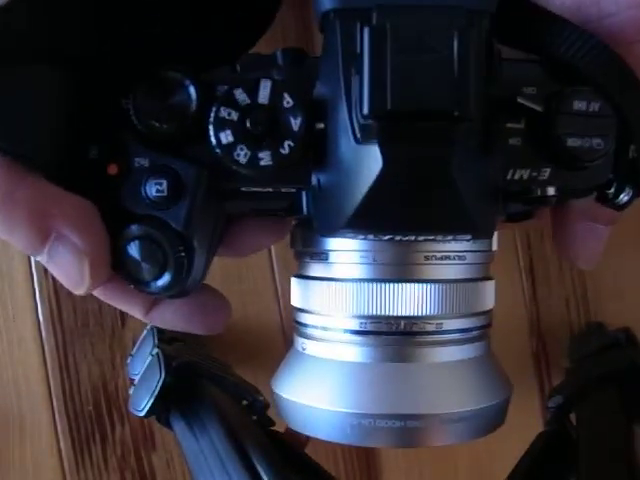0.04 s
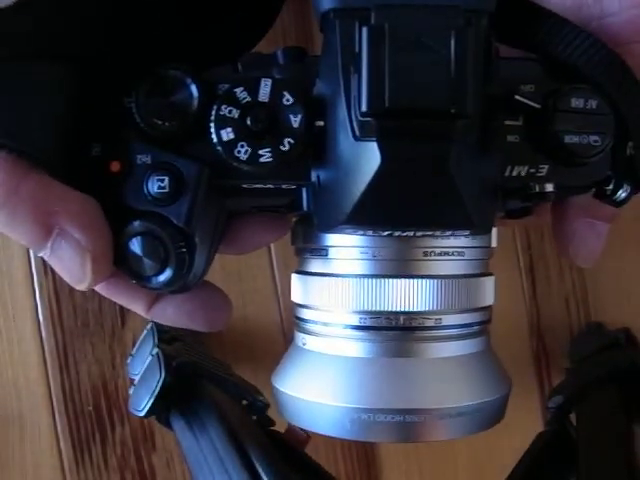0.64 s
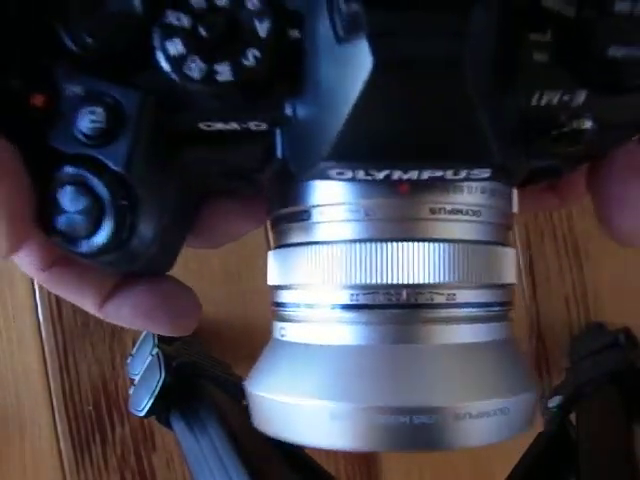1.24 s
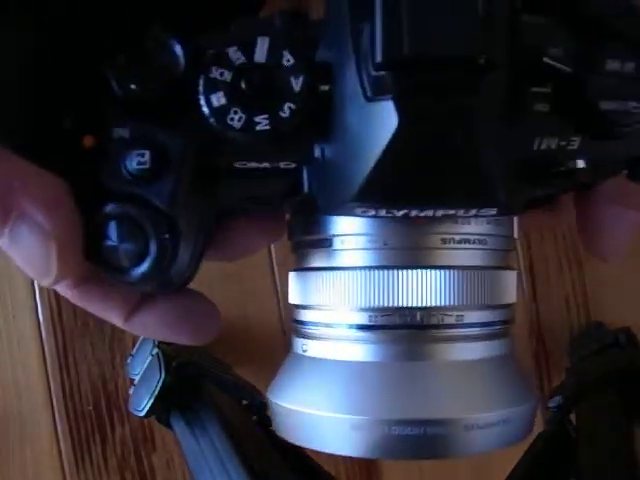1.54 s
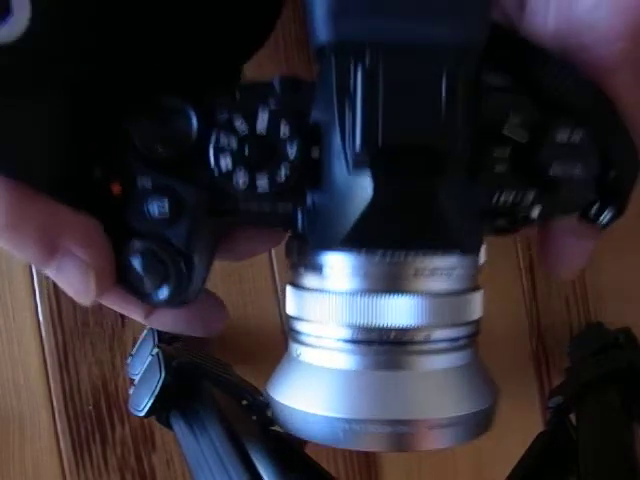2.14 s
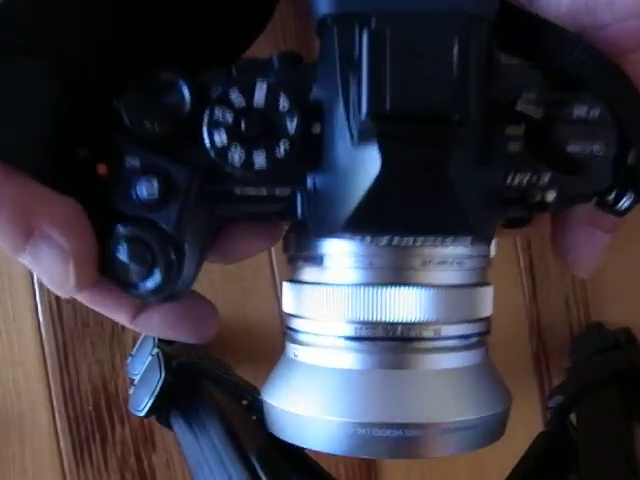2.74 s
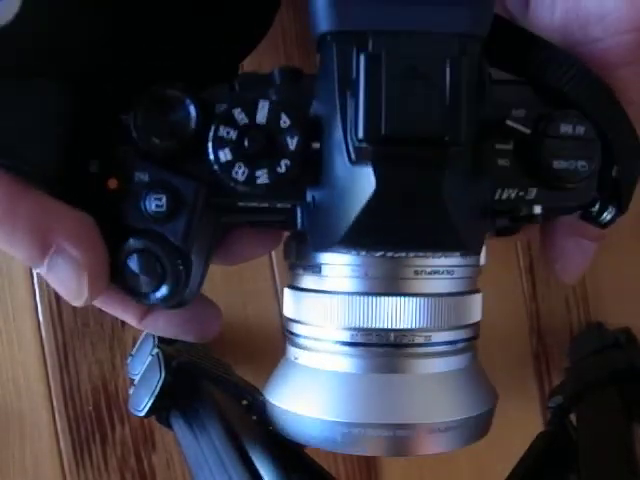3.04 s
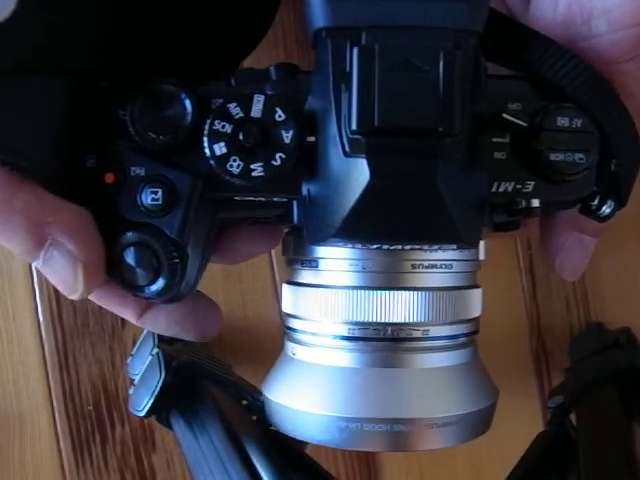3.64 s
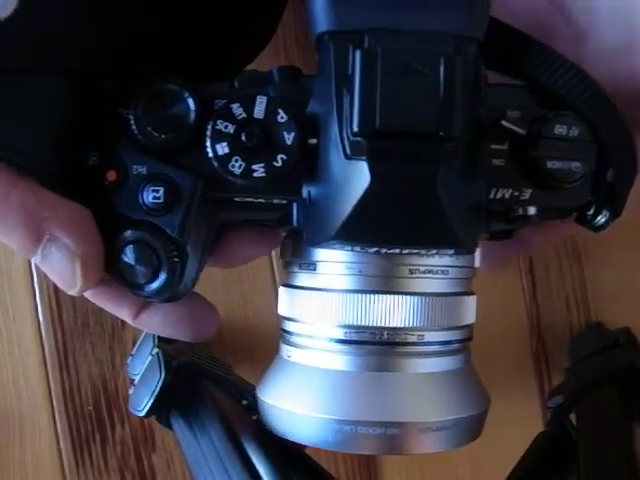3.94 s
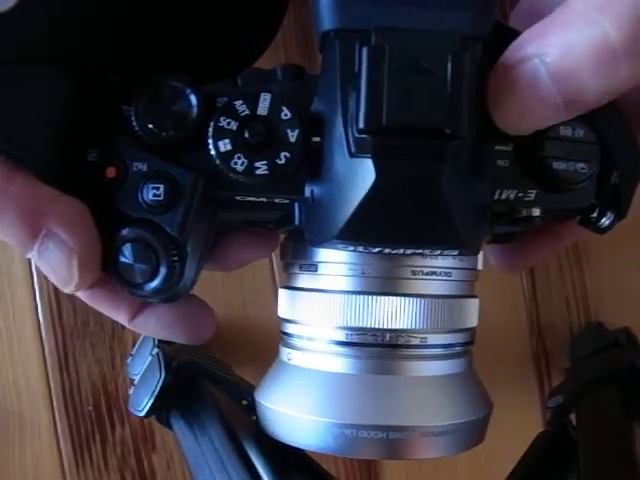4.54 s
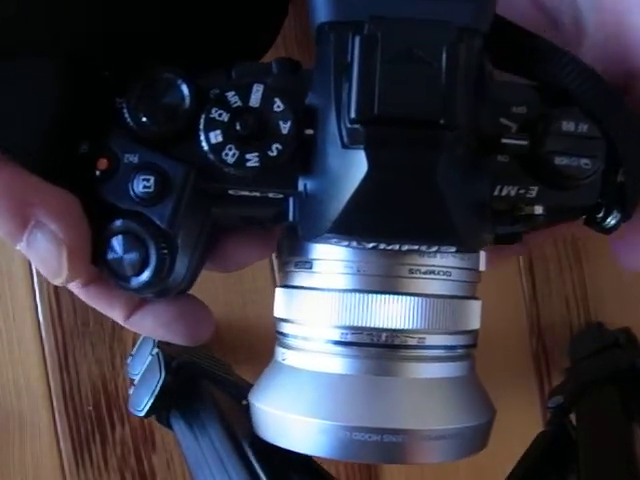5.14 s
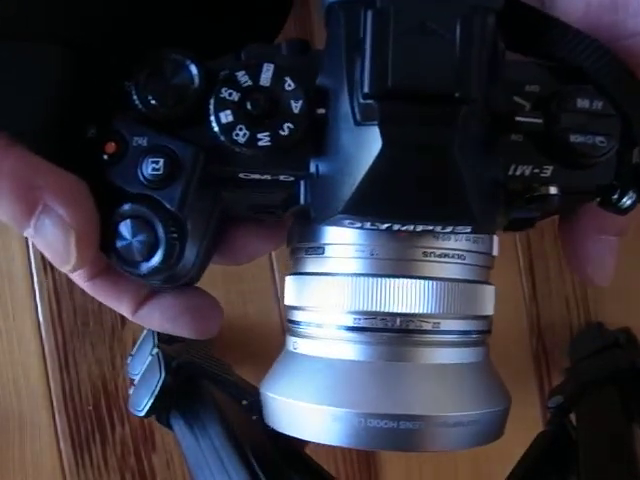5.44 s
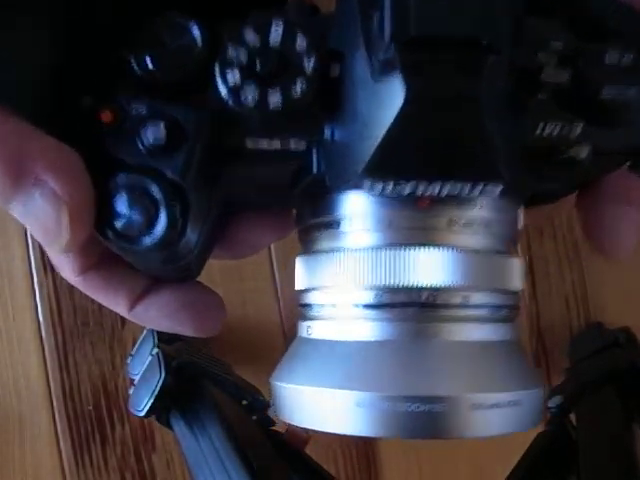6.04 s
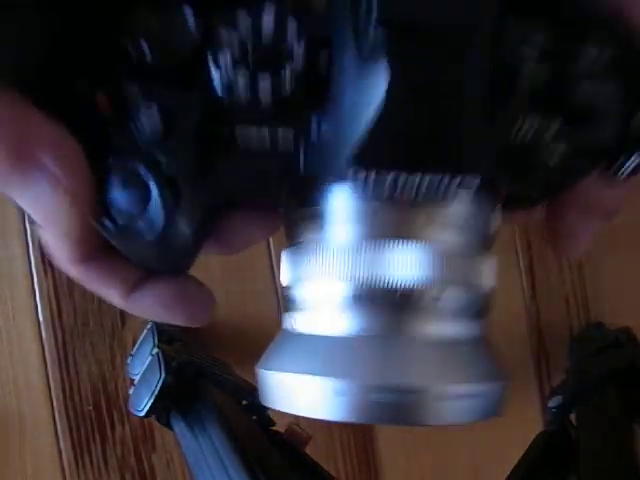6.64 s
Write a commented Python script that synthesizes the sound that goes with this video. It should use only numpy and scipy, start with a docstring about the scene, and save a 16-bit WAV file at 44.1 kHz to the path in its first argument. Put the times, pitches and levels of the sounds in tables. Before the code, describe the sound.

A small camera shaken by hand rattles with six sharp clicks, then a switch snaps and its mechanism thumps.

```python
"""A quiet room, with a switched-off camera shaken by hand close to the microphone.
At each stroke a loose carriage inside hits its stop and bounces, ringing the body.
Then a thumb snaps the power switch; the mechanism thumps and slides into its held position.
Under it lie faint brushes of skin, soft room noise, hiss and a thin, throbbing electronic whine."""
import sys
import numpy as np
from scipy import signal
from scipy.fft import rfft, irfft
from scipy.io import wavfile

SR = 44100
rng = np.random.default_rng(int(sys.argv[2]) if len(sys.argv) > 2 else 0)


def transcribe(u):
    """Save the signal u as a 16-bit wav file named by the first command-line argument.

    u: samples, shape (n,) or (channels, n), limited to [-1, 1]; the rate is SR.
    q: integer samples, one column per channel.
    """
    v = np.clip(np.atleast_2d(u).T, -1, 1)
    q = np.round(v * 32767).astype(np.int16)
    wavfile.write(sys.argv[1], SR, q)


N = 299880
TIME = np.arange(N) / SR

# The carriage hitting its stop. Each row: time in seconds, strength in dB, brightness in dB per octave,
# graze and second corner in dB against the hit, corner delay and first flight in seconds,
# second flight as a share of the first, change per bounce in dB.
STROKES = [(1.3688, -1, -2, -36, -30, 0.0076, 0.012, 0.74, -6),
           (1.7250, -1, -2.5, -37, -9.5, .006, 0.016, .24, -9),
           (1.8830, -8.5, -5, -32, -21, .006, .027, .5, -15),
           (2.1227, -1, -1, -7, -6.5, 0.0066, .0160, 0.83, -7.5),
           (2.4963, 0, -2, -10, -8, .0067, .0163, 0.49, -6.5),
           (2.8960, 3, -2, -4.5, -8.5, .0091, 0.022, 0.38, -8)]
def carriage_blows(graze_lead_s=0.0048, dull_db_per_octave=-2):
    """The carriage grazes its guide, hits, lands a second corner, then bounces twice, weaker and duller."""
    blows = []
    for s, db, bright, graze_db, corner_db, corner_s, flight_s, share, loss_db in STROKES:
        blows.append((s - graze_lead_s, db + graze_db, bright))
        blows.append((s, db, bright))
        blows.append((s + corner_s, db + corner_db, bright + dull_db_per_octave))
        for k, delay_s in enumerate([flight_s, flight_s * (1 + share)], 1):
            blows.append((s + delay_s, db + k * loss_db, bright + k * dull_db_per_octave))
    return blows


# The ring of the body and of its outer shell, heard close up.
# Each row: frequency in Hz, level at resonance in dB, time to fall 60 dB in seconds.
BODY_MODES = [(700, -12.5, 0.006), (1075, 1, 0.029), (1410, -3, 0.011), (1610, -5, 0.02), (1866, 1, 0.013),
              (2100, 2, 0.014), (2322, 5, 0.017), (2770, 3, 0.019), (3500, 3.5, 0.0067),
              (3780, 0.5, 0.0065), (3810, -2.5, 0.0084), (4030, 3.5, 0.014), (4440, -3, .012),
              (5140, 4, 0.036), (5300, -7, 0.034), (5930, -3, 0.052), (6320, 6, 0.017), (6760, -11, 0.034),
              (8760, -19.5, .008), (9740, -7, 0.015), (9920, 2.5, 0.02), (10990, 2, 0.013),
              (11300, -11, 0.0061), (13200, -9, 0.011)]
SHELL_MODES = [(405, -1, 0.024), (2010, 3, 0.015), (2286, 1.5, 0.023)]
# The brief crack of contact. Each row: frequency in Hz, level in dB.
CRACK_SPECTRUM = [(100, -45), (400, -0.5), (700, -2.5), (1200, 6.5), (3400, 8.5), (6500, 5), (8000, -1.5),
                  (12000, 4), (16000, -14)]
def rattle(crack_db=-11, crack_t60=0.013, flex_power=3):
    """Each blow of the loose carriage cracks and rings the body; only hard ones flex the shell."""
    blows = carriage_blows()
    body = strike(blows, BODY_MODES, pivot_hz=2480, contact_s=0.00026, scatter_db=2.5)
    flexing = [(s, flex_power * db, 0) for s, db, _ in blows]
    shell = strike(flexing, SHELL_MODES, pivot_hz=1000, contact_s=0.00074, scatter_db=-1.0)
    cracks = np.zeros(N)
    for s, db, bright in blows:
        add(cracks, s, undb(db + bright + crack_db) * burst(crack_t60))
    return low_cut(body + shell + colour(cracks, CRACK_SPECTRUM), hz=267)


# The thumb on the switch, two light touches and the snap.
# Each row: time in seconds, strength in dB, brightness in dB per octave.
THUMB_BLOWS = [(3.803, -28.5, -1.5), (3.8643, -30.5, -.5), (4.6826, 1, 1.5)]
# The lever's ring. Each row: frequency in Hz, level at resonance in dB, time to fall 60 dB in seconds.
LEVER_MODES = [(1060, 4.5, 0.016), (1640, 5, 0.0094), (2390, 7.5, 0.015), (3020, 6, 0.009),
               (4070, 7.5, 0.017), (4870, 7.5, 0.012), (6260, 11, 0.005), (7080, 8, 0.013),
               (7700, 6, 0.012), (8480, 9, 0.0046), (9430, 10, .004), (10240, 8, 0.0069), (12050, 8, 0.004),
               (13000, 7, 0.0044)]
# The contacts' buzz, and the even hiss that comes back to the microphone from all sides of the room.
# Each row: frequency in Hz, level in dB.
BUZZ_SPECTRUM = [(300, -32), (2000, -18), (6000, -1), (11000, 1), (13000, 7), (15000, -11)]
SWITCH_ECHO_SPECTRUM = [(500, -25), (1200, -18), (2500, -11.5), (4000, -12.5), (6000, -7), (8000, -11.5),
                        (10700, -5.5), (12500, -15), (15000, -29)]
def switch(buzz_db=-6, buzz_t60=0.015):
    """The sprung lever snaps over with a bright ring, a buzz of its contacts and a short room echo."""
    buzz, clicks = np.zeros((2, N))
    for s, db, _ in THUMB_BLOWS:
        add(buzz, s, undb(db + buzz_db) * burst(buzz_t60))
        add(clicks, s, undb([db]))
    lever = strike(THUMB_BLOWS, LEVER_MODES, pivot_hz=7000, contact_s=0.00009, scatter_db=3, detune=0.0036)
    return lever + colour(buzz, BUZZ_SPECTRUM) + room(clicks, SWITCH_ECHO_SPECTRUM, build_s=0.0089)


# The mechanism taking hold. Each row: time in seconds, strength in dB, brightness in dB per octave.
CATCHES = [(4.9518, -15, -4), (4.9556, 0, 0), (4.9597, -5.5, 1), (4.9625, -2.5, 1), (5.0248, -24, -5.5)]
# The deep ring of the body in the hand, close to the microphone.
# Each row: frequency in Hz, level at resonance in dB, time to fall 60 dB in seconds.
THUMP_MODES = [(105, 14, 0.049), (146, 24.5, 0.037), (205, 15, 0.21), (346, 14, 0.051), (405, 18, 0.034),
               (469, 11.5, 0.13), (515, 16.5, 0.058), (613, 12.5, 0.044), (1130, 8, 0.026),
               (1310, 2, 0.0083), (1580, 1, .015), (2330, -1.5, 0.013)]
def thump(turn_lead_s=0.009, turn_db=-30.5, turn_bright=5, chatter_start_s=4.9712, chatter_gap_s=0.01):
    """The whole body jolts: softly as a stroke turns, hard as the mechanism catches and chatters."""
    turns = [(s - turn_lead_s, db + turn_db, turn_bright) for s, db, *_ in STROKES]
    # Pulling away from the stop gives three even taps, each weaker and duller.
    chatter = [(chatter_start_s + k * chatter_gap_s, -13.5 - 1.2 * k, 5.5 - 2 * k) for k in range(3)]
    blows = turns + CATCHES + chatter
    jolts = strike(blows, THUMP_MODES, pivot_hz=404, contact_s=0.00043, scatter_db=1.3, opposed=False)
    return low_cut(low_cut(jolts, hz=84.5), hz=78)


# Three pushes on the carriage. Each row: start and length in seconds, friction and squeak levels in dB.
PUSHES = [(4.95, .014, -41.5, -60), (4.985, 0.037, -46.5, -52.5), (5.042, 0.0084, -49.5, -46.5)]
# The colour of the friction. Each row: frequency in Hz, relative level in dB.
FRICTION_SPECTRUM = [(300, -8), (800, -20), (1300, -0.5), (1750, -2.5), (2150, 3.5), (2450, -4),
                     (3000, 1.5), (4100, -1), (5500, -6), (11500, -9), (15000, -31)]
def slide(slips_per_s=4000, uneven_db=3, squeak_hz=2030):
    """Dense stick-slip ticks and a rough squeak as the carriage slides to the centre."""
    slips = (rng.random(N) < slips_per_s / SR) * rng.choice([-1, 1], N)
    slips = slips * undb(uneven_db * rng.standard_normal(N))
    friction = low_cut(colour(slips, FRICTION_SPECTRUM), hz=130)
    pitch_hz = squeak_hz * (1 + 0.06 * wander(600))
    pressure = undb(3 * wander(400))
    squeak = pressure * np.sin(2 * np.pi * np.cumsum(pitch_hz) / SR)
    rubbing = sum(undb(db) * gate(s, length, attack_s=0.0022) for s, length, db, _ in PUSHES)
    squeaking = sum(undb(db) * gate(s, length, attack_s=0.007) for s, length, _, db in PUSHES)
    return level(friction, 0) * rubbing + level(squeak, 0) * squeaking


# The grip shifting, faint even this close. Each row: loudest moment and length in seconds, level in dB.
BRUSHES = [(1.12, 0.18, -63), (3.86, 0.19, -65), (4.01, 0.16, -61.5), (6.76, .22, -66)]
# The hiss of skin on the body. Each row: frequency in Hz, relative level in dB.
SKIN_SPECTRUM = [(1000, -24), (5000, -5), (8000, -3), (11000, 5), (15000, -22.5)]
def grip():
    """Fingers brush over the body, each touch swelling and fading."""
    touch = sum(undb(db) * np.exp(-(2 * (TIME - s) / length) ** 2) for s, length, db in BRUSHES)
    return level(colour(rng.standard_normal(N), SKIN_SPECTRUM), 0) * touch


# What the room returns of the body to the microphone. Each row: frequency in Hz, level in dB.
BODY_ECHO_SPECTRUM = [(150, -16), (600, -14.5), (1100, -10.5), (1600, -6.5), (2150, -9), (2700, -9),
                      (3300, -15.5), (6000, -16.5), (14000, -10)]
def body_echo(knocks, mechanism, mechanism_db=-4):
    """The room answers the knocks and, more weakly, the mechanism."""
    return room(knocks + undb(mechanism_db) * mechanism, BODY_ECHO_SPECTRUM, build_s=0.0078)


def room(x, spectrum, build_s, low_t60=0.36, high_t60=0.33, split_hz=4000):
    """A diffuse tail builds up as reflections arrive; the treble dies sooner."""
    low = signal.sosfilt(signal.butter(2, split_hz, fs=SR, output="sos"), burst(low_t60))
    high = low_cut(burst(high_t60), split_hz)
    build = 1 - np.exp(-(TIME[:len(low)] / build_s) ** 2)
    return signal.fftconvolve(x, colour((low + high) * build, spectrum))[:N]


def whine(hz=15735, throb_hz=13.05, throb_depth=0.55, off_db=-61, power_on_s=5.0, rise_db=2.3):
    """A thin electronic whine throbs throughout and grows a little once the power is on."""
    throb = 1 + throb_depth * np.cos(2 * np.pi * throb_hz * TIME)
    tone = np.sin(2 * np.pi * hz * TIME) * throb
    return level(tone, off_db) * undb(rise_db * (TIME > power_on_s))


# The quiet room at the microphone. Each row: frequency in Hz, relative level in dB.
ROOM_TONE_SPECTRUM = [(20, -10), (50, -6.5), (100, -2.5), (190, -1), (330, -1.5), (500, -3.5), (670, -3.5),
                      (900, -5), (1500, -7.5), (2500, -8.5), (4300, -10.5), (10000, -12.5), (14000, -11.5),
                      (16000, -30)]
def room_tone(db=-56.5):
    """Soft, steady room noise with hiss."""
    return level(colour(rng.standard_normal(N), ROOM_TONE_SPECTRUM), db)


def strike(blows, modes, pivot_hz, contact_s, scatter_db, detune=0.012, opposed=True):
    """Each blow (s, dB, dB per octave about the pivot) rings the modes, varied by where it lands."""
    hz, db, t60 = np.transpose(modes)[:, :, None]
    t = TIME[:SR // 6]
    # When opposed, neighbouring modes swing against each other.
    sign = (-1) ** np.arange(len(modes))[:, None] if opposed else 1
    amplitude = 2 * np.log(1000) / (t60 * SR)  # unit gain at resonance
    envelope = sign * amplitude * fade(t, t60) * (1 - np.exp(-t / contact_s))
    out = np.zeros(N)
    for s, strength, bright in blows:
        scatter, shift = rng.standard_normal((2, len(modes), 1))
        gain = undb(db + strength + bright * np.log2(hz / pivot_hz) + scatter_db * scatter)
        tones = np.sin(2 * np.pi * hz * (1 + detune * shift) * t)
        add(out, s, np.sum(gain * envelope * tones, axis=0))
    return out


def colour(x, spectrum, size=4096):
    """Minimum-phase filter with the given (Hz, dB) spectrum."""
    hz, db = np.transpose(spectrum)
    bin_hz = np.fft.rfftfreq(size, 1 / SR)
    gain = undb(np.interp(np.log(bin_hz + 1), np.log(hz), db))
    cepstrum = irfft(np.log(gain))[:size // 2]
    cepstrum[1:] *= 2
    impulse = irfft(np.exp(rfft(cepstrum, size)))[:size // 2]
    return signal.fftconvolve(x, impulse)[:len(x)]


def low_cut(x, hz):
    """Second-order high-pass: a small body radiates little below its lowest mode."""
    return signal.sosfilt(signal.butter(2, hz, "high", fs=SR, output="sos"), x)


def burst(t60):
    """Decaying noise of unit energy, half a second long."""
    t = TIME[:SR // 2]
    noise = rng.standard_normal(len(t)) * fade(t, t60)
    return noise / np.sqrt(np.sum(noise ** 2))


def wander(rate):
    """Random drift through rate new values a second; spread near 1."""
    knots = np.arange(0, N / SR + 1, 1 / rate)
    return np.interp(TIME, knots, rng.standard_normal(len(knots)))


def gate(start, length, attack_s, t60=0.045):
    """Gain that rises at the start, holds for the length and then dies away."""
    rise = np.clip((TIME - start) / attack_s, 0, 1)
    return rise * fade(np.maximum(TIME - start - length, 0), t60)


def fade(t, t60):
    """Decay by 60 dB in t60 seconds."""
    return np.exp(-np.log(1000) * t / t60)


def add(track, s, sound):
    """Mix a sound in at s seconds."""
    start = int(s * SR)
    track[start:start + len(sound)] += sound[:len(track) - start]


def level(x, db):
    """Scale a sound to an rms level."""
    return x * undb(db) / np.sqrt(np.mean(x ** 2))


def undb(db):
    """Decibels to gain."""
    return 10 ** (np.asarray(db) / 20)


def scene():
    """The camera close to the microphone, a little room behind it; both channels carry the same sound."""
    knocks = rattle()
    mechanism = thump() + slide()
    mix = knocks + mechanism + body_echo(knocks, mechanism) + switch() + grip() + whine() + room_tone()
    return np.tile(mix, (2, 1))


def record(dry, top_hz=16300):
    """The recorder cuts the top treble steeply."""
    return signal.sosfilt(signal.ellip(8, 0.2, 70, top_hz, fs=SR, output="sos"), dry)


dry = scene()
out = record(dry)
transcribe(out)
```